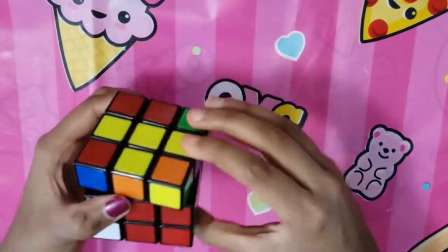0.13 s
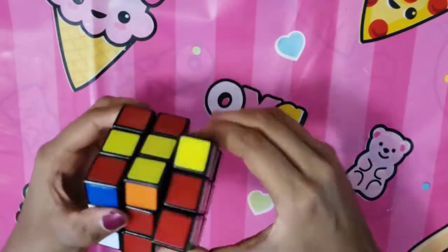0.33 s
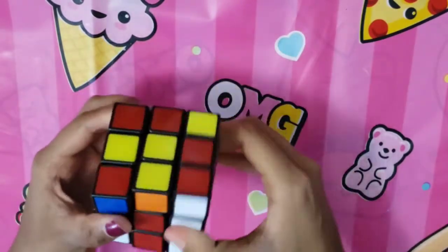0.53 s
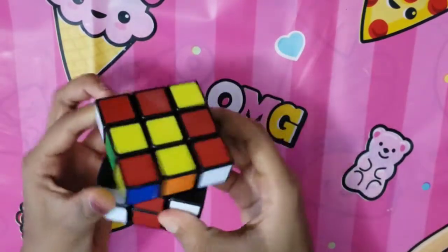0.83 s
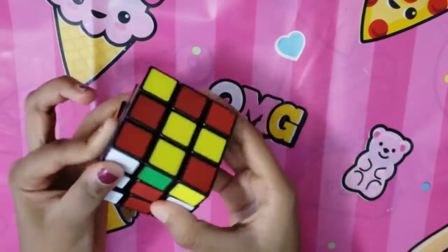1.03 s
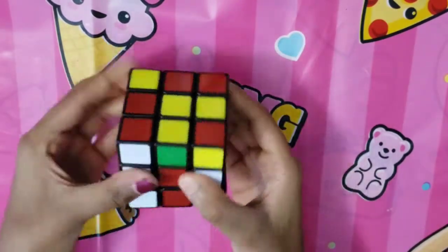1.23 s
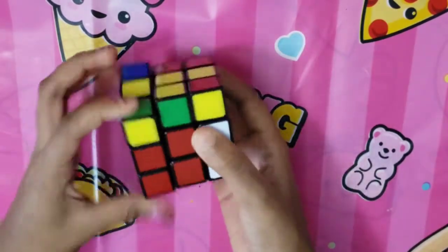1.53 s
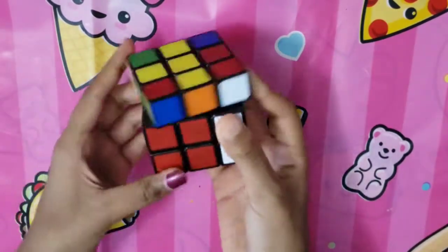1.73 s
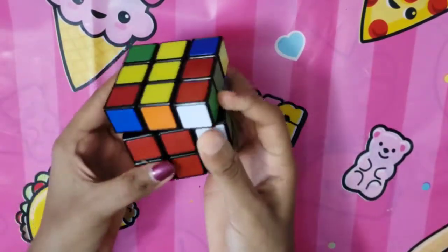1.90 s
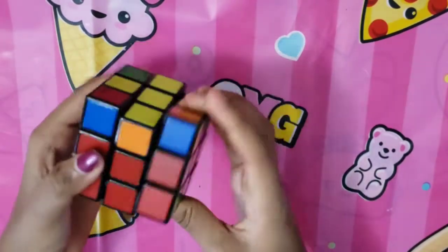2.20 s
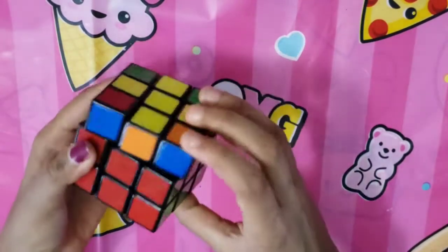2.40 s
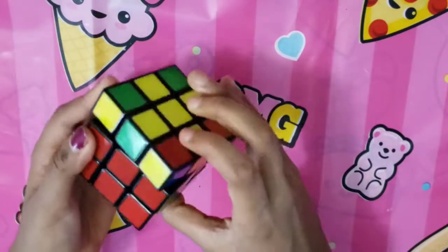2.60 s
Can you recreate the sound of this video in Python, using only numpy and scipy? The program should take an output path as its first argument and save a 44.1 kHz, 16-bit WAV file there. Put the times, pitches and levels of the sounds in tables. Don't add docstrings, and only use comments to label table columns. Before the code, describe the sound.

Close, dry plastic clacks and lighter ticks from a twisted puzzle cube come in bursts, with a short lull near one second, then more clicks and light scuffing, over quiet indoor rumble and hum.

```python
import sys
import numpy as np
from scipy import signal
from scipy.fft import rfft, irfft
from scipy.io import wavfile
from scipy.ndimage import uniform_filter1d

SR = 44100
rng = np.random.default_rng(int(sys.argv[2]) if len(sys.argv) > 2 else 0)


def how_loud(loudness_db):
    steps = np.asarray(loudness_db, float) / 20
    return 10 ** steps


def transcribe(u):
    v = np.clip(np.atleast_2d(u).T, -1, 1)
    q = np.round(v * 32767).astype(np.int16)
    wavfile.write(sys.argv[1], SR, q)


N = 121275

# (frequency [Hz], level [dB per Hz])
TONE_SPECTRUM = [(22, -12), (55, -0.5), (190, -29.5), (450, -34), (1100, -43.5), (3000, -50),
                 (16000, -53.5)]
# (time [s], level [dB])
DRONE_SWELLS = [
    (.6, -86),
    (.66, -63.5),
    (.93, -69.5),
    (1.05, -84.5),
    (1.26, -67),
    (1.4, -76),
    (1.65, -76.5),
    (2.5, -86),
    (2.6, -65.5),
]
# (frequency [Hz], likeness [0-1])
PORT_LIKENESS = [(60, 0.93), (400, 0.4), (3500, 0)]
# (frequency [Hz], time to fall 60 dB [s])
ROOM_DECAY = [(1000, 0.35), (15000, 0.4)]
# (frequency [Hz], left over right [dB])
PORT_BALANCE = [(1300, 3), (3000, 4), (6500, 10.5), (9000, -2.5), (14000, -1.5)]
# (frequency [Hz], left ahead of right [radians])
PORT_PHASE = [(3500, 0.53), (7300, 1.4), (8300, -2.5), (12400, 1.7)]
# (time [s], level [dB])
SCUFF_LEVEL = [
    (.15, -80),
    (.3, -65.5),
    (.62, -68.5),
    (.75, -93),
    (.9, -67),
    (1.2, -84),
    (1.36, -64),
    (2.3, -70),
    (2.5, -67.5),
    (2.62, -66.5),
]
# (frequency [Hz], level [dB], time to fall 60 dB [s])
BODY_MODES = [(490, -32, 0.0031), (879, -6.5, 0.0098), (1178.4, -6.5, 0.0065), (1419.5, -1, 0.0092),
              (1599, 0, 0.0068), (1935, -3, 0.0056)]
# (frequency [Hz], level [dB], time to fall 60 dB [s])
SHELL_MODES = [(2471, -7.5, 0.0049), (3050, 1.5, 0.0038), (3742, -2, 0.003), (4657, -6.5, 0.0018)]
# (frequency [Hz], level [dB], time to fall 60 dB [s])
EDGE_MODES = [(7300, 1, 0.00048), (10070, -4, 0.0019), (12840, -2, 0.001)]
RADIATES_ABOVE = [504, 1920, 4440]
PORT_DIFFERENCE = [.05, .2, .55]
# (time [s], body [dB], shells [dB], edge tick [dB], body pitch [Hz])
EARLY_CATCHES = [(0.0047, -59, -65, -80, 1920), (0.0077, -60.5, -73, -77, 1670),
                 (0.1623, -53, -60, -69, 1810), (0.1867, -57.5, -66, -71, 1570),
                 (0.2015, -52, -71, -78, 1860), (0.2123, -35.5, -36.5, -40, 1430),
                 (0.2214, -64, -57, -61, 1400), (0.244, -42.5, -66, -67, 1690),
                 (0.2524, -68, -77, -68, 1500), (0.2901, -54.5, -59, -66, 1540),
                 (0.3093, -43, -46.5, -54, 1830), (0.321, -40, -52, -47, 1600),
                 (0.3232, -30.5, -45, -40, 1740), (0.3272, -53, -35, -38.5, 1580),
                 (0.3317, -42, -49, -43, 1600), (0.3403, -25.5, -29.5, -33, 1536),
                 (0.342, -50, -41, -44.5, 1600), (0.3473, -28, -35, -33.5, 1427),
                 (0.35, -37.5, -31.5, -38, 1680), (0.4554, -41.5, -46, -44, 1480),
                 (0.4873, -56, -72, -67, 1450), (0.5362, -47, -59, -68, 1500),
                 (0.585, -45, -56.5, -57, 1770), (0.6082, -44.5, -49.5, -51, 1450),
                 (0.6185, -63, -78, -77, 1560), (0.6405, -53.5, -82, -85, 1451),
                 (0.6775, -58.5, -63, -69, 1730), (0.7976, -53, -61, -59.5, 1670),
                 (0.8065, -50, -59, -58, 1500), (0.8174, -33, -44, -41, 1720),
                 (0.8395, -53, -48, -62, 1610), (0.8497, -42.5, -42, -44, 1870),
                 (0.9007, -79, -69, -74, 1670), (0.9455, -39, -49, -45.5, 1750),
                 (0.9508, -40.5, -47.5, -49.5, 1730), (0.9571, -47.5, -56, -49, 1700)]
# (time [s], body [dB], shells [dB], edge tick [dB], body pitch [Hz])
MID_CATCHES = [(0.9637, -41.5, -43, -41, 1640), (0.9706, -48.5, -54, -46, 1600),
               (0.9822, -48, -54.5, -56, 1470), (0.9882, -52, -60, -65, 1740),
               (1.2513, -60, -68.5, -66.5, 1850), (1.2925, -54.5, -79, -60, 1760),
               (1.3237, -40.5, -54.5, -56, 1960), (1.3285, -51, -72, -50.5, 1650),
               (1.3338, -45, -52, -54, 1700), (1.3514, -35, -44.5, -43.5, 1660),
               (1.36, -38, -47, -46, 1960), (1.374, -32.5, -38, -39, 1700), (1.3856, -65, -48, -46, 1680),
               (1.393, -68, -56, -53, 1600), (1.4127, -51, -55, -58, 1566), (1.4379, -40, -40, -44.5, 1800),
               (1.4618, -44.5, -52, -56, 1160), (1.5505, -58, -73, -61.5, 1350),
               (1.5794, -46.5, -67, -62, 1500), (1.5984, -44, -52, -50, 1560),
               (1.6028, -36.5, -43, -57, 1640), (1.612, -72, -75, -71, 1660),
               (1.6426, -40, -49.5, -51.5, 1617), (1.6865, -51, -43.5, -47, 1570),
               (1.689, -36.5, -51, -40.5, 1540), (1.6944, -32, -39.5, -39.5, 1530),
               (1.6995, -61, -56, -42, 1600), (1.7031, -30, -30.5, -33.5, 1560),
               (1.7165, -31.5, -37, -42, 1390), (1.7292, -48, -49, -43.5, 1504),
               (1.7426, -46, -60, -48.5, 1500), (1.786, -47, -53, -57, 1420), (1.8135, -37, -31, -38, 1660),
               (1.825, -61, -67, -51, 1490), (1.8347, -48, -59, -52.5, 1560),
               (1.9186, -46, -47, -55.5, 1600)]
# (time [s], body [dB], shells [dB], edge tick [dB], body pitch [Hz])
LATE_CATCHES = [(1.9523, -49, -59, -64, 1670), (1.956, -55, -60, -69, 1570), (1.995, -52.5, -65, -78, 1170),
                (2.0365, -51, -60, -72, 1500), (2.0544, -41, -48, -44, 1650), (2.0586, -39, -35, -43, 1850),
                (2.0616, -34, -52, -44, 1580), (2.0693, -40.5, -66, -52, 1460),
                (2.0866, -44, -47, -56, 1520), (2.0897, -42, -50, -53, 1540), (2.12, -56, -69, -81, 1390),
                (2.1423, -50.5, -53.5, -62, 1490), (2.1676, -39, -42, -48.5, 1480),
                (2.1959, -44, -44.5, -30, 1538), (2.2064, -60, -66, -48, 1636),
                (2.2105, -58, -66, -48, 1560), (2.2502, -52, -64, -55, 1480),
                (2.2555, -46.5, -56, -76, 1570), (2.31, -49, -53, -57.5, 1340),
                (2.345, -59, -70, -63, 1600), (2.393, -54, -74, -82, 1460), (2.3994, -64, -71, -79, 1630),
                (2.4179, -37.5, -47, -44.5, 1620), (2.4225, -42, -48.5, -48.5, 1670),
                (2.429, -47, -57, -58, 1570), (2.4586, -38, -45.5, -51, 1500),
                (2.468, -38.5, -54, -33, 1640), (2.4723, -42.5, -43, -43, 1590),
                (2.4896, -48, -51, -70, 1630), (2.502, -57, -73, -67, 1530), (2.507, -44, -54, -65, 1480),
                (2.531, -46.5, -51.5, -52.5, 1920), (2.5406, -47.5, -57, -69, 1450),
                (2.546, -44, -51, -69, 1430), (2.554, -51, -58, -55, 1580), (2.5564, -49, -48, -50, 1400),
                (2.6907, -54.5, -62, -91, 1780)]
SNAP_TIMES = [.2122, .244, .3237, .6083, 1.3516, 1.7026, 2.0866, 2.1965, 2.4184, 2.4681]


def at_hz(points, hz):
    table_hz, values = np.transpose(points)
    return np.interp(np.log(np.maximum(hz, 1)), np.log(table_hz), values)


def in_time(points):
    seconds, db = np.transpose(points)
    return how_loud(np.interp(np.arange(N) / SR, seconds, db))


def rms_one(x):
    return x / np.sqrt(np.mean(x ** 2) + 1e-20)


def above(x, hz):
    return signal.sosfilt(signal.butter(3, hz, "high", fs=SR, output="sos"), x)


def between(x, low_hz, high_hz, order):
    return signal.sosfilt(signal.butter(order, [low_hz, high_hz], "band", fs=SR, output="sos"), x)


def bands(count):
    edges = np.geomspace(18, 17000, count + 1)
    return [(low, np.sqrt(low * high), high) for low, high in zip(edges, edges[1:])]


def paired(noises, hz):
    alike = np.clip(at_hz(PORT_LIKENESS, hz), 0, 1)
    return np.sqrt(1 + alike) * noises[0] + np.sqrt(1 - alike) * noises[1] * [[1], [-1]]


def ring(x, hz, t60):
    shrink = how_loud(-60 / (max(t60, 3e-4) * SR))
    turn = 2 * np.pi * hz / SR
    return signal.lfilter([0, np.sin(turn)], [1, -2 * shrink * np.cos(turn), shrink ** 2], x + 1e-18)


def ring_modes(x, hz, db, t60):
    return sum((-1) ** k * how_loud(db[k]) * ring(x, hz[k], t60[k]) for k in range(len(hz)))


def contacts(shape, per_second):
    spread_db = 2.0
    sizes = how_loud(spread_db * np.minimum(rng.exponential(1, shape), 4))
    signs = rng.choice([-1, 1], shape)
    return sizes * signs * (rng.random(shape) < per_second / SR)


def rumble(white):
    patchy_db = 2
    out = 0
    for k, (low, hz, high) in enumerate(bands(26)):
        slow = np.interp(np.arange(N), np.linspace(0, N, 14), rng.standard_normal(14))
        band = paired(between(white[k % 2], low, high, 2)[:, SR:], hz)
        out = out + how_loud(at_hz(TONE_SPECTRUM, hz) + patchy_db * slow) * band
    return how_loud(-56.5) * rms_one(out)


def mains_hum():
    hz, t60 = 50.18, 0.48
    noise = rng.standard_normal(N + SR)
    return how_loud(-58) * rms_one(ring(ring(noise, hz, t60), hz, t60)[SR:])


def vent(white):
    low_hz, high_hz = 1500, 2690
    return how_loud(-72) * rms_one(paired(between(white[:, :N], low_hz, high_hz, 4), low_hz))


def distant_drone():
    pitch_hz, width_hz = 138.4, 10.8
    wobble_noise, rumble_noise = rng.standard_normal((2, N + SR))
    wobble = rms_one(ring(wobble_noise, 3.15, 0.21)[SR:])
    phase = 2 * np.pi * np.cumsum(pitch_hz + width_hz / 2 * wobble) / SR
    low_roar = rms_one(above(ring(rumble_noise, 204, 0.068), 143)[SR:])
    return in_time(DRONE_SWELLS) * (np.sqrt(2) * np.sin(phase) + how_loud(-8) * low_roar)


def room_tone():
    white = rng.standard_normal((2, 2, N + SR))
    return vent(white[0]) + rumble(white) + distant_drone() + mains_hum()


def bump():
    start_s, decay_s, low_hz, high_hz = 2.57, 0.049, 223, 335
    t = np.maximum(np.arange(N) / SR - start_s, 0)
    noise = paired(between(rng.standard_normal((2, N)), low_hz, high_hz, 2), low_hz)
    return how_loud(-68.5) * rms_one(noise) * np.e * t / decay_s * np.exp(-t / decay_s)


def room(x):
    onset_s, table_s, table_dull_hz = 0.0046, 0.0058, 3170
    room_db, table_db = -10, -12
    t = np.arange(SR) / SR
    white = rng.standard_normal((2, 2, SR))
    tail = 0
    for k, (low, hz, high) in enumerate(bands(14)):
        band = paired(between(white[k % 2], low, high, 2), hz / 4)
        tail = tail + band * how_loud(-60 * t / at_hz(ROOM_DECAY, hz))
    tail = tail * (1 - np.exp(-t / onset_s))
    dull = signal.butter(1, table_dull_hz, fs=SR, output="sos")
    near = signal.sosfilt(dull, paired(rng.standard_normal((2, SR)), 300.0)) * np.exp(-t / table_s)
    echoes = how_loud(room_db) * tail / np.sqrt(np.sum(tail ** 2) / 2)
    echoes = echoes + how_loud(table_db) * near / np.sqrt(np.sum(near ** 2) / 2)
    return signal.fftconvolve(x[None], echoes, axes=1)[:, :N]


def ports(pair):
    hz = np.arange(N // 2 + 1) * SR / N
    half = how_loud(at_hz(PORT_BALANCE, hz) / 2) * np.exp(0.5j * at_hz(PORT_PHASE, hz))
    return irfft(rfft(pair) * np.array([half, 1 / half]), N)


def scuff():
    uneven = np.repeat(rng.standard_normal(N // 300 + 1), 300)[:N]
    touches = contacts(N, 350) * how_loud(3 * uneven)
    out = 0
    for modes, low_hz, level_db in zip((BODY_MODES, SHELL_MODES, EDGE_MODES), RADIATES_ABOVE, (0, -10, -9)):
        sound = above(ring_modes(touches, *np.transpose(modes)), low_hz)
        out = out + how_loud(level_db) * rms_one(sound)
    return in_time(SCUFF_LEVEL) * out


def catches():
    contacts_per_s = 12000
    mode_spread_db, mode_shift = 2.2, 0.03
    grip_db_per_octave = 13.5
    bright_tilt_db = 11
    shield_hz = 1022
    rows = np.vstack([EARLY_CATCHES, MID_CATCHES, LATE_CATCHES])
    lead, size = 300, 1000
    t = (np.arange(size) - lead) / SR
    snaps = np.abs(rows[:, :1] - np.array(SNAP_TIMES)).min(1) < 0.0022
    bright = snaps & (rows[:, 3] > rows[:, 2])
    rise_s = np.where(snaps, 0.00027, 0.0015)[:, None]
    fall_s = np.where(bright, 0.0004, 0.001)[:, None]
    swell = np.exp(-np.abs(t) / np.where(t < 0, rise_s, fall_s))[:, None]
    single = 1.0 * (np.arange(size) == lead)
    out = np.zeros((3, N + 2 * size))
    for part, modes in enumerate([BODY_MODES, SHELL_MODES, EDGE_MODES]):
        hz, db, t60 = np.transpose(modes)
        grip_db = grip_db_per_octave * (part == 0)
        touches = contacts((len(rows), 2, size), contacts_per_s) * swell
        for row, (same, other), high in zip(rows, touches, bright):
            apart = PORT_DIFFERENCE[part] * other
            to_walls = np.roll(single, 37 * part)
            push = above(np.array([same + apart, same - apart, to_walls]), RADIATES_ABOVE[part])
            level_draw, pitch_draw = rng.standard_normal((2, len(hz)))
            mode_db = db + mode_spread_db * level_draw - grip_db * np.abs(np.log2(hz / row[4]))
            mode_db = mode_db + bright_tilt_db * high * np.log2(hz / 9e3)
            hit = ring_modes(push, hz * (1 + mode_shift * pitch_draw), mode_db, t60)
            hit[2] *= np.linalg.norm(hit[0]) / np.linalg.norm(hit[2])
            hit[:2] = above(hit[:2], shield_hz)
            power = hit[:2].mean(0) ** 2
            start = int(row[0] * SR) - uniform_filter1d(power, size=50).argmax() + size
            loudest = np.sqrt(uniform_filter1d(power, size=100).max())
            out[:, start:start + size] += hit / loudest * how_loud(row[part + 1])
    return out[:, size:size + N]


def scene():
    hits, slide = catches(), scuff()
    cube = hits[:2] + slide + room(hits[2] + slide)
    return ports(cube) + room_tone() + bump()


def top_cut(x):
    return signal.sosfilt(signal.butter(12, 16960, fs=SR, output="sos"), x)


def record(dry):
    hz = np.arange(N + 1) * SR / N / 2
    shelf = how_loud(-30 * np.clip((hz - 15950) / 200, 0, 1))
    mix = irfft(rfft(dry, 2 * N) * shelf, 2 * N)[:, :N]
    return top_cut(mix)


dry = scene()
out = record(dry)
transcribe(out)
```